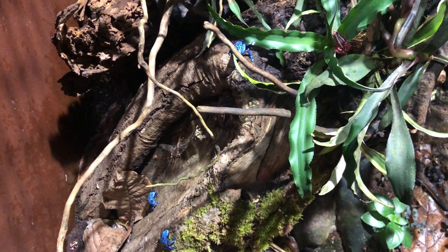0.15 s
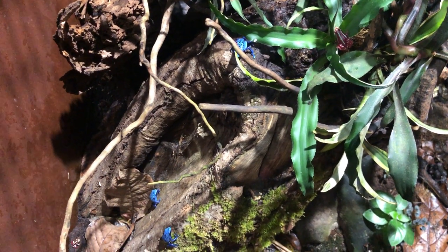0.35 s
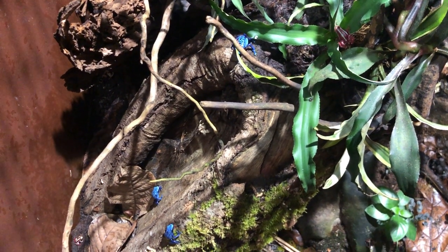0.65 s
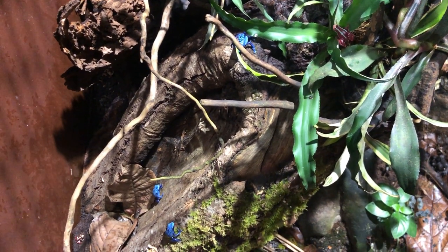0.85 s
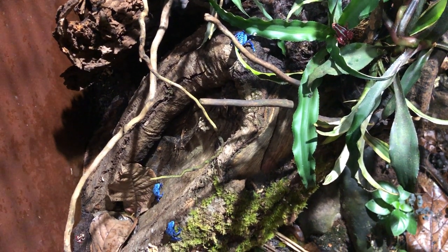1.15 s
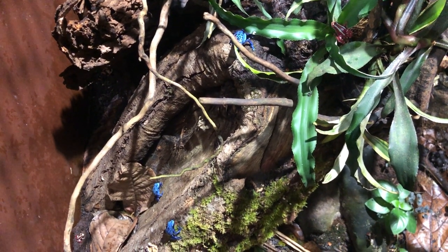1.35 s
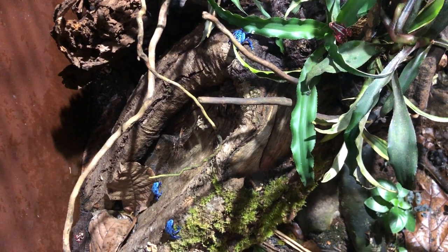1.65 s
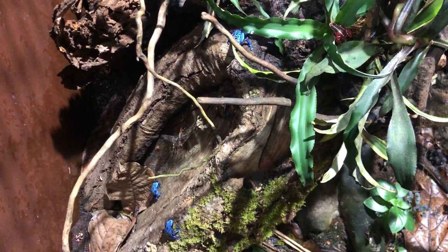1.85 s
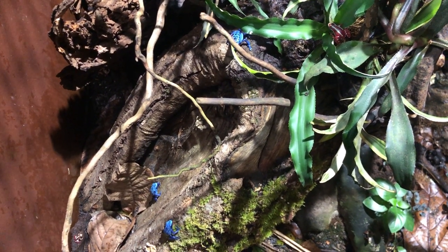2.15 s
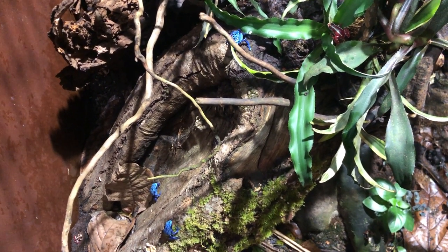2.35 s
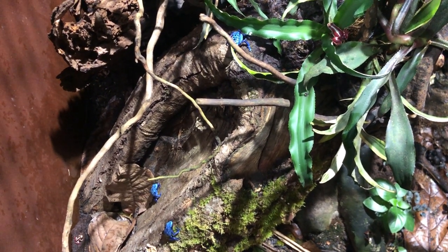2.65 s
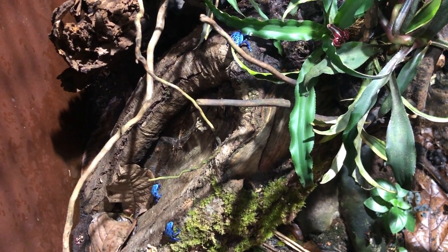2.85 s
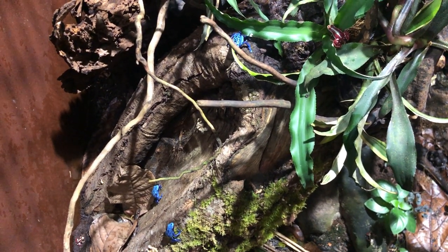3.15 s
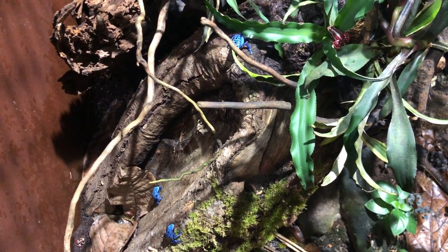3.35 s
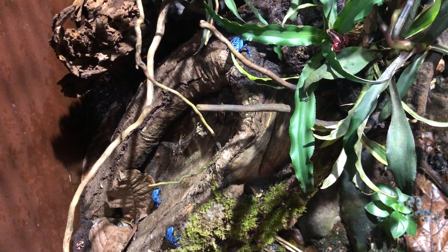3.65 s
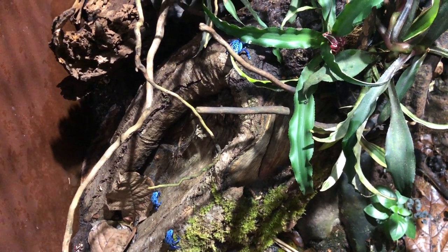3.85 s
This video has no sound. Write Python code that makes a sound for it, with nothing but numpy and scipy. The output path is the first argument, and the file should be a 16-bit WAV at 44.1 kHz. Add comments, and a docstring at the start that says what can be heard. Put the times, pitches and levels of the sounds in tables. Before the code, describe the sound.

Two frogs trill one after the other in a terrarium over a low ventilation hum.

```python
"""In a glass terrarium, two poison frogs trill one after the other, about 19 notes a second.
Each note is a short upward sweep, strongest in its second harmonic, thrown back by the walls.
Faint high chirps, perhaps crickets, ring in the room beyond, over the hum of ventilation.
One small dry tick sounds just before the second trill."""
import sys
import numpy as np
from scipy import signal
from scipy.fft import rfft, irfft, next_fast_len
from scipy.io import wavfile
from scipy.ndimage import uniform_filter1d

SR = 44100
rng = np.random.default_rng(int(sys.argv[2]) if len(sys.argv) > 2 else 0)


def store_pcm(level_fs):
    """Save levels as 16-bit WAV."""
    pcm = np.round(np.clip(level_fs, -1, 1) * 32767).astype(np.int16)
    wavfile.write(sys.argv[1], SR, np.atleast_2d(pcm).T)


N = 176400

# tone colour of the moving air: (frequency [Hz], relative level per Hz [dB])
AIR_SPECTRUM = [(22, -42), (31, -12), (41, 3), (70, 2), (120, 0), (200, -0.5), (380, -3), (600, -2.5),
                (1000, -7), (1700, -10.5), (2250, -10.5), (2900, -16), (5500, -18), (7000, -20),
                (9500, -27.5), (12500, -33.5), (15500, -40)]
# ventilation hum: (frequency [Hz], level [dB], width [Hz])
HUM_LINES = [(200.3, -63, 14.5), (293.4, -64, 4.4), (459.6, -69.5, 10)]
# distant chirps: (time [s], length [s], level before the room mix [dB], pitch [Hz], scatter [share])
CHIRP_CUES = [(.3, .07, -53.5, 7800, .007), (.328, .08, -54.5, 8000, .01), (.445, .05, -56, 7740, .009),
              (.76, .06, -55.5, 7950, .04), (0.998, .14, -49, 7560, .008), (1.18, 0.027, -56, 7560, .008),
              (1.565, .115, -50, 7720, .016), (2.372, .06, -56, 7680, .018), (2.66, .07, -58.5, 7900, .04),
              (2.914, .09, -46.5, 7610, .01), (3.0, .05, -54, 7800, .013), (3.705, .11, -53, 7590, .014),
              (3.79, .075, -51.5, 7960, .018)]
# ring of the tick: (frequency [Hz], relative level [dB], time to fall 60 dB [s])
TICK_RING = [(2450, -2, 0.032), (3260, -4, 0.022), (4100, 0, 0.028), (4870, -2, 0.028)]
# each frog's trill: (time [s], base level [dB], base pitch [Hz])
NEAR_TRILL = [(0.0211, -23.5, 2322), (0.0729, -23.5, 2328), (0.1266, -24, 2324), (0.1787, -23.5, 2328),
              (0.232, -24, 2326), (0.283, -24, 2330), (0.3353, -23.5, 2330), (0.3898, -23.5, 2315),
              (0.4426, -23.6, 2325), (0.4949, -23.5, 2325), (0.5475, -23.5, 2325), (0.6016, -23.8, 2322),
              (0.6562, -24, 2313), (0.709, -24, 2327), (0.7622, -23.5, 2320), (0.8159, -24, 2326),
              (0.8696, -23.4, 2320), (0.9234, -24, 2323), (0.9771, -24, 2321), (1.0299, -23.5, 2320),
              (1.0834, -23.5, 2310), (1.139, -23.5, 2303), (1.1987, -23.5, 2306)]
FAR_TRILL = [(1.7318, -32.5, 2075), (1.7778, -31.5, 2110), (1.8263, -31.5, 2130), (1.8837, -32, 2150),
             (1.9331, -31.5, 2175), (1.9842, -31.5, 2185), (2.0327, -31, 2195), (2.0827, -31, 2200),
             (2.1348, -31.4, 2192), (2.1861, -30.6, 2198), (2.2343, -31.0, 2206), (2.2865, -30.4, 2202),
             (2.3431, -31.0, 2192), (2.3944, -30.5, 2204), (2.4473, -30.3, 2198), (2.4996, -29.3, 2217),
             (2.5502, -29.0, 2207), (2.5995, -28.8, 2217), (2.6493, -29.9, 2214), (2.7009, -29.7, 2204),
             (2.7536, -29.7, 2210), (2.8051, -29.7, 2204), (2.8568, -29.8, 2208), (2.9068, -29.2, 2212),
             (2.9577, -29.1, 2210), (3.0085, -28.8, 2215), (3.0597, -28.4, 2211), (3.1117, -29.1, 2212),
             (3.1648, -29.0, 2208), (3.2171, -29.4, 2206), (3.2696, -29.0, 2204), (3.3217, -29.2, 2201),
             (3.3719, -28.0, 2216), (3.4246, -29.1, 2217), (3.4762, -29.0, 2212), (3.5282, -28.3, 2213),
             (3.5818, -29.7, 2205), (3.6363, -29.2, 2200), (3.6959, -30.9, 2178)]
# pitch bend of a full-length note: (time [s], pitch [ratio to base pitch])
NEAR_BEND = [(0, 0.91), (.004, 0.9677), (.009, 1.0038), (0.015, 1.015), (.018, 1.04)]
FAR_BEND = [(0, .92), (.001, .943), (.004, .957), (.0085, .998), (.011, 1.016), (.0135, 1.035),
            (.0155, 1.0), (.018, .97)]
# envelope of a full-length note: (time [s], relative level [dB])
NEAR_ENVELOPE = [(0, -18.5), (.0006, -8.5), (.0035, -2.5), (.006, -1.7), (0.0108, 0), (.014, -8),
                 (0.017, -34)]
FAR_ENVELOPE = [(0, -14), (.0005, -5), (.0035, -5), (.006, -2), (0.0106, 0.5), (.014, -6), (.018, -39)]
# strength of a harmonic by where it lies: (frequency [Hz], relative level [dB])
NEAR_TIMBRE = [(2250, -38), (4200, 0), (4800, 0), (6400, -28), (6850, -22), (7100, -30), (8700, -34),
               (9400, -35), (11000, -51), (11700, -37), (13000, -53), (13600, -44), (14200, -53)]
FAR_TIMBRE = [(2200, -26), (3700, 0), (4700, 0), (6100, -22), (6900, -20), (8400, -18.5), (8700, -26),
              (8950, -16.5), (9200, -25), (10200, -25), (10500, -29), (10950, -17.5), (11300, -26),
              (12400, -35), (13500, -37), (14200, -56)]
# wall reflections at each perch: (delay [s], relative level [dB])
NEAR_ECHOES = [(0.002109, -.9), (0.00652, -14), (0.011044, -12.5), (0.014335, -9.5), (0.022911, -16.2),
               (0.033, -16)]
FAR_ECHOES = [(0.004369, 0), (0.008022, -5.5), (0.012, -7), (0.0164, -6.3), (0.025858, -12),
              (0.027947, -17)]

ROOM_T60_S, ROOM_DELAY_S = .72, .008
TANK_T60_S, TANK_DELAY_S = .32, .014
CHIRP_PULSES_PER_S, CHIRP_FALL = 85, .02  # each pulse falls by this share of its pitch
JITTER, SHIMMER, FLUTTER_STEP_S = .004, .06, .0006  # flutter of pitch and of level, as shares
SECOND_HARMONIC_GAIN_DB, LOW_CUT_HZ = 1.4, 3400
# a cold start: the first notes are shorter and brighter, hit harder and fade as they go
WARM_UP_S, COLD_LENGTH_SHARE, COLD_BRIGHT_DB, COLD_PUSH_DB, COLD_FADE_DB = .4, .5, 4, 3.5, -12


def amp(db):
    """Decibels to gain."""
    return 10 ** (np.asarray(db) / 20)


def unit_rms(x):
    """Scales to rms 1."""
    return x / np.sqrt(np.mean(x ** 2) + 1e-20)


def add(mix, start_s, sound):
    """Drops a sound into the mix at its cue."""
    part = mix[max(round(start_s * SR), 0):][:len(sound)]
    part += sound[:len(part)]


def curve(x, table):
    """Reads a breakpoint curve at x."""
    return np.interp(x, *np.transpose(table))


def wander(n, step_s):
    """A random modulation curve that turns every step_s."""
    knots = rng.standard_normal(400)
    return np.interp(np.arange(n) / SR / step_s % 399, np.arange(400), knots)


def reverb(x, t60_s, delay_s):
    """The wet signal: a diffuse tail of energy 1 that fades in after a pre-delay."""
    t = np.arange(SR) / SR
    fade_in = np.clip(t / delay_s - 1, 0, 1)
    tail = rng.standard_normal(SR) * np.exp(-np.log(1000) * t / t60_s) * fade_in
    return signal.fftconvolve(x, tail / np.linalg.norm(tail))[:N]


def ventilation(air_db=-50, patch_db=1.0):
    """The bed: steady, slightly patchy air noise, with narrow noise bands as a wavering hum."""
    hz = np.fft.rfftfreq(4096, 1 / SR)
    points_hz, points_db = np.transpose(AIR_SPECTRUM)
    colour_db = np.interp(np.log(hz + 1), np.log(points_hz), points_db)
    real, imag, patches = rng.standard_normal((3, N // 1024 + 5, len(hz)))
    patches = uniform_filter1d(patches, size=4, axis=0)  # smear in time
    patches = unit_rms(uniform_filter1d(patches, size=30, axis=1))  # and in frequency
    frames = (real + 1j * imag) * amp(colour_db + patch_db * patches)
    air = amp(air_db) * unit_rms(signal.istft(frames.T, nperseg=4096, noverlap=3072)[1][:N])
    fine_hz, white = np.fft.rfftfreq(N, 1 / SR), rfft(rng.standard_normal(N))
    hum = sum(amp(db) * unit_rms(irfft(white / (1 + (2 * (fine_hz - centre) / width) ** 2), N))
              for centre, db, width in HUM_LINES)
    return air + hum


def chirps(octave_db=-27, direct_db=-5):
    """Distant runs of quick, falling pulses, washed in room reverb."""
    out = np.zeros(N)
    for start, length, db, hz, scatter in CHIRP_CUES:
        t = np.arange(0, length, 1 / SR)
        cycle = t * CHIRP_PULSES_PER_S % 1
        pitch = hz * (1 + CHIRP_FALL * (.5 - cycle) + scatter * wander(len(t), step_s=.001))
        phase = 2 * np.pi * np.cumsum(pitch) / SR
        tone = np.sin(phase) + amp(octave_db) * np.sin(2 * phase)
        pulses = np.sin(np.pi * cycle) ** 2 * np.sin(np.pi * t / length) ** .7
        add(out, start, amp(db) * unit_rms(pulses * tone))
    return amp(direct_db) * out + reverb(out, ROOM_T60_S, ROOM_DELAY_S)


def tick(start_s=1.689, level_db=-43):
    """A small dry tick: four modes that ring out fast."""
    out, t = np.zeros(N), np.arange(SR // 20) / SR
    for hz, db, t60 in TICK_RING:
        decay = np.exp(-np.log(1000) * t / t60)
        add(out, start_s, amp(level_db + db) * decay * np.sin(2 * np.pi * hz * t))
    return out


def walls(x, echoes, trim_db=0):
    """The direct sound and its early reflections off the glass."""
    size = next_fast_len(N + SR // 10)
    hz = np.fft.rfftfreq(size, 1 / SR)
    paths = 1 + sum(amp(db + trim_db) * np.exp(-2j * np.pi * hz * delay) for delay, db in echoes)
    return irfft(rfft(x, size) * paths, size)[:N]


def terrarium(call, echoes, tank_db, room_db=-19.5):
    """Sets a call in the tank and the room; the walls return its second harmonic most strongly."""
    second, others = call
    early = walls(second, echoes) + walls(others, echoes, trim_db=-6.5)
    tank = amp(tank_db) * reverb(second + others, TANK_T60_S, TANK_DELAY_S)
    room = amp(room_db) * reverb(second + others, ROOM_T60_S, ROOM_DELAY_S)
    return early + tank + room


def snaps(notes, trim_db=-21, decay_s=.0006):
    """The attack layer: a tiny puff of bright noise as each note breaks in."""
    out, t = np.zeros(N), np.arange(SR // 200) / SR
    for start, db, _ in notes:
        add(out, start, amp(db + trim_db) * np.exp(-t / decay_s) * rng.standard_normal(len(t)))
    return signal.sosfilt(signal.butter(3, [4000, 11500], "bandpass", fs=SR, output="sos"), out)


def main_tone_eq(second):
    """Sets the level of the note's main tone and cuts the lows beneath it."""
    low_cut = signal.butter(3, LOW_CUT_HZ, "highpass", fs=SR, output="sos")
    return signal.sosfilt(low_cut, second) * amp(SECOND_HARMONIC_GAIN_DB)


def trill(notes, bend, envelope, timbre, warms_up):
    """A train of swept notes on two stems: the strong second harmonic, and the other six."""
    second, others = np.zeros((2, N))
    for start, db, hz in notes:
        cold = max(1 - (start - notes[0][0]) / WARM_UP_S, 0) if warms_up else 0
        stretch = 1 - cold * (1 - COLD_LENGTH_SHARE)
        t = np.arange(0, envelope[-1][0] * stretch, 1 / SR) / stretch  # time along the note's curves
        pitch = hz * curve(t, bend) * (1 + JITTER * wander(len(t), FLUTTER_STEP_S))
        phase = 2 * np.pi * np.cumsum(pitch) / SR
        level_db = db + curve(t, envelope) + cold * (COLD_PUSH_DB + COLD_FADE_DB * t / t[-1])
        level = amp(level_db) * (1 + SHIMMER * wander(len(t), FLUTTER_STEP_S))
        for k in range(1, 8):
            stem, bright_db = (second, 0) if k == 2 else (others, cold * COLD_BRIGHT_DB)
            add(stem, start, level * amp(bright_db + curve(k * pitch, timbre)) * np.sin(k * phase))
    return main_tone_eq(second), others


def frogs():
    """The lead: the near frog calls first, then the far one, whose notes start with a snap."""
    near_call = trill(NEAR_TRILL, NEAR_BEND, NEAR_ENVELOPE, NEAR_TIMBRE, warms_up=False)
    far_call = trill(FAR_TRILL, FAR_BEND, FAR_ENVELOPE, FAR_TIMBRE, warms_up=True)
    near = terrarium(near_call, NEAR_ECHOES, tank_db=-13.5)
    far = terrarium(far_call, FAR_ECHOES, tank_db=-10.5)
    return near + far + snaps(FAR_TRILL)


def scene():
    """The mono mix: frogs up front, chirps and tick behind, ventilation underneath."""
    return (frogs() + chirps() + tick() + ventilation())[None]


def record(dry):
    """A steep high cut at 15.8 kHz over the whole mix."""
    high_cut = signal.firwin(511, 15800, window=("kaiser", 9), fs=SR)
    return signal.oaconvolve(dry, high_cut[None], "same")


dry = scene()
out = record(dry)
store_pcm(out)
```